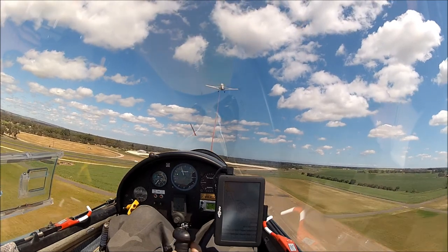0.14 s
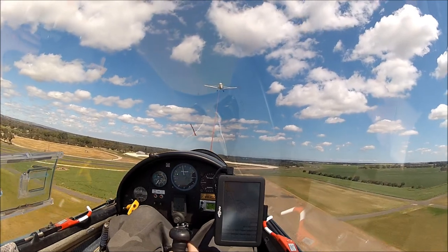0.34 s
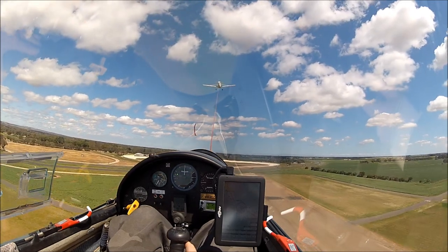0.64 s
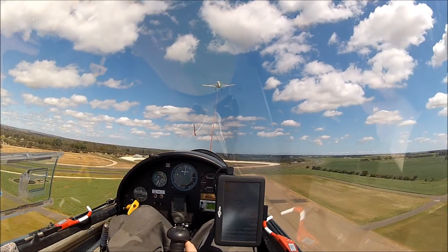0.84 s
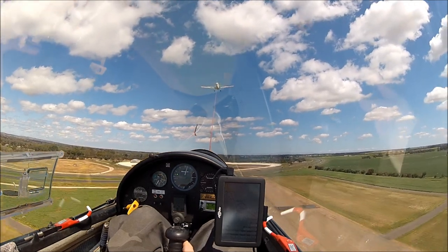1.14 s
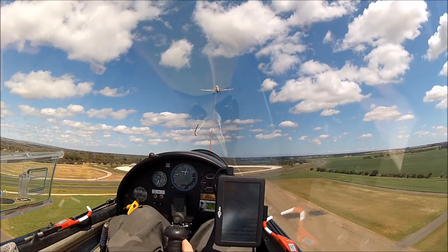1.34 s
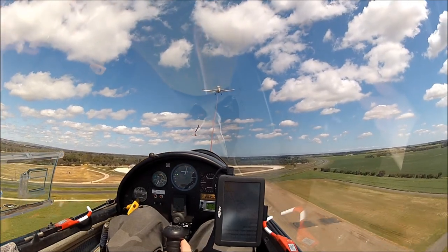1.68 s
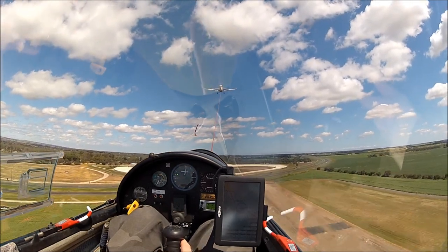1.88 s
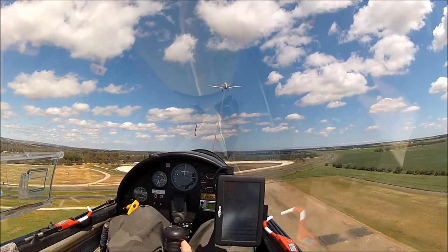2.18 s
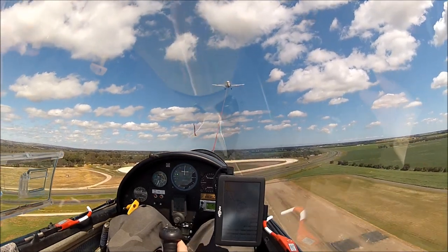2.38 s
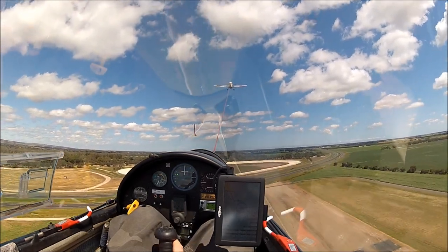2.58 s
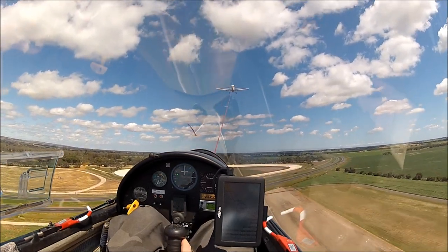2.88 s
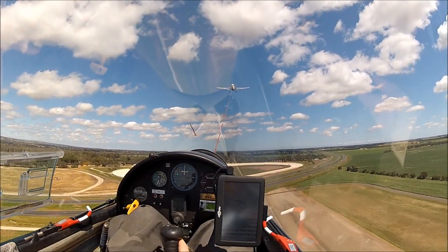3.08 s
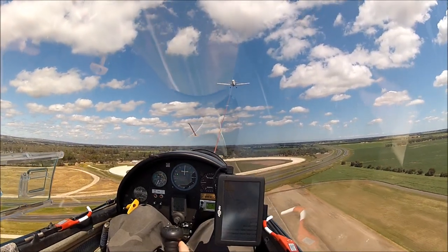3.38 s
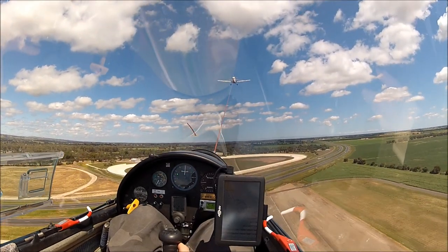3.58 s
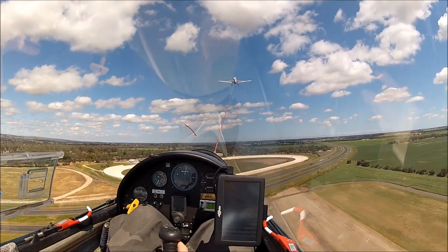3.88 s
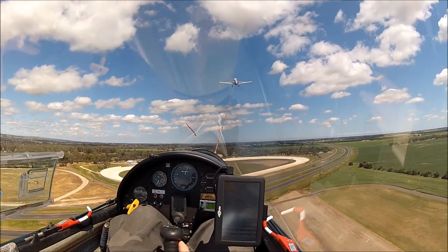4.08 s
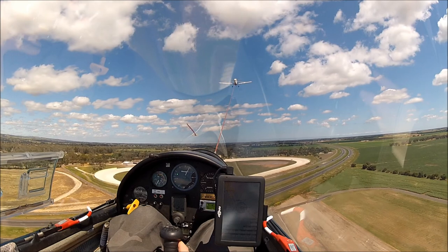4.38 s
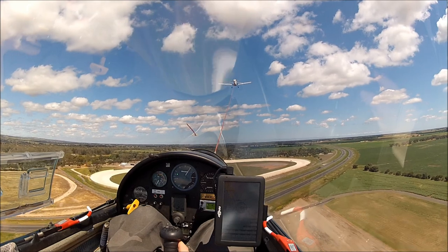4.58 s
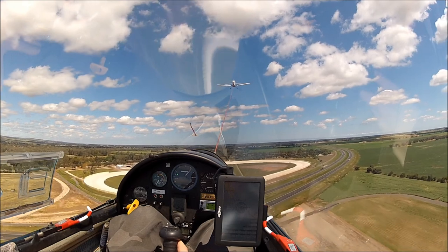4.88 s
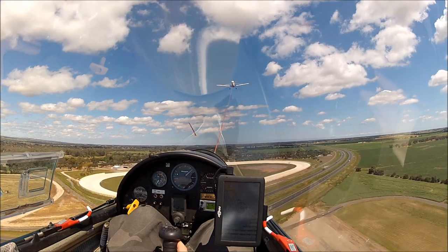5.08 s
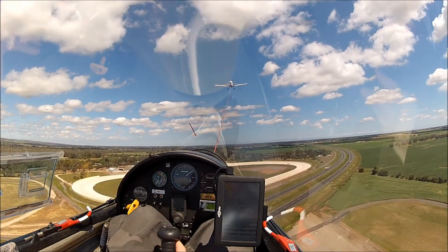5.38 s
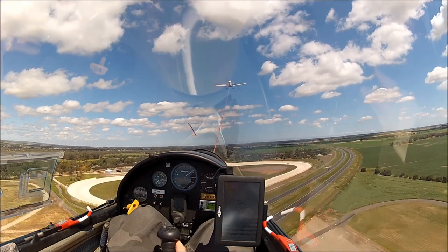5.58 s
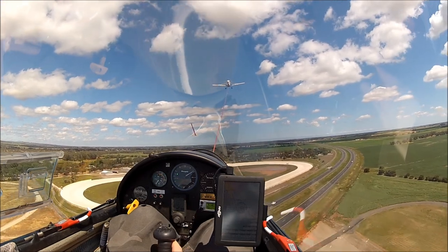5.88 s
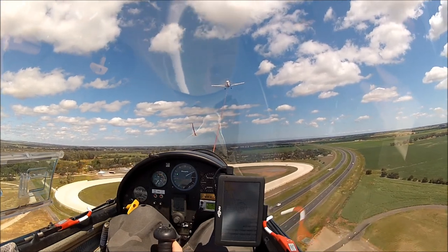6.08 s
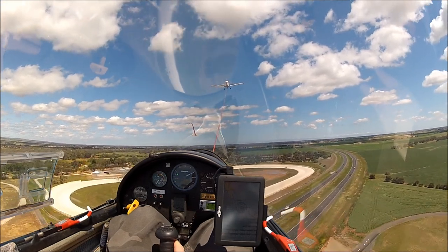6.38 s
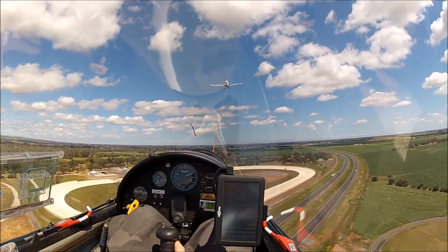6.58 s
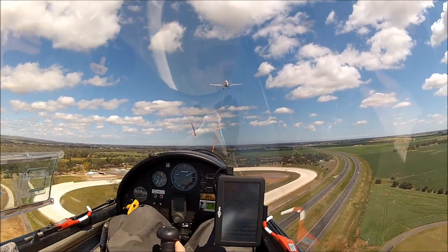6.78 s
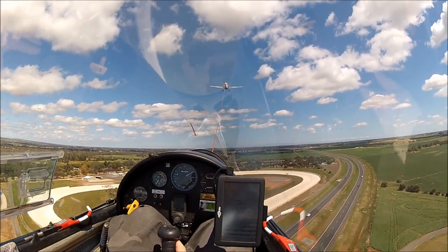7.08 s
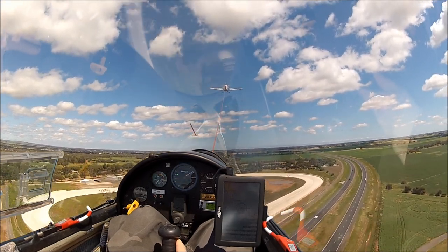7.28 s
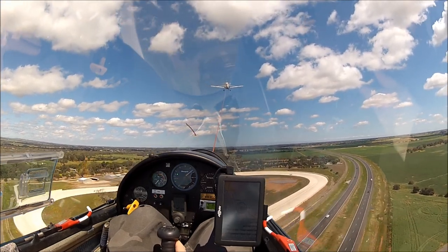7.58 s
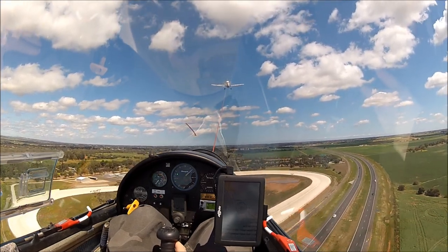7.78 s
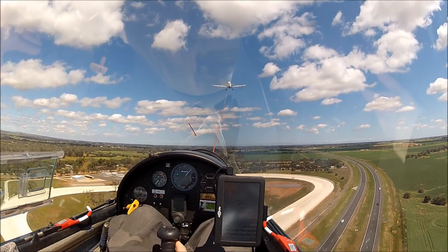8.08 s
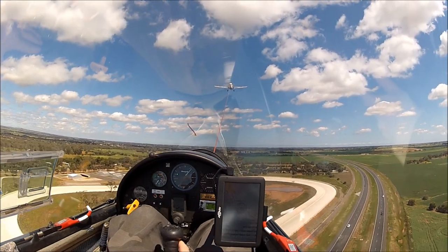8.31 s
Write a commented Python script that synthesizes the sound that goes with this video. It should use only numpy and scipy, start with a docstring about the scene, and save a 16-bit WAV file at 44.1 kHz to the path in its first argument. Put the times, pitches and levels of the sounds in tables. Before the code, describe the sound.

Close inside a small glider cockpit on tow, a deep fluttering boom and muffled wind roar run continuously. A short rush of air opens it, faint gusts pass the canopy in the first few seconds, and a light double knock comes just after two. The flow eases near three, then booms back. A thin, gritty high sizzle follows the rumble.

```python
"""Inside the cockpit of a glider climbing on tow. Turbulent air excites the low cavity modes, which boom and beat
against each other. The slipstream roars through the shell and hisses at the canopy seals; a few brief gusts
rush past the canopy edge, and a loose fitting knocks lightly by modal ringing.
A sampler holding its values at a low rate mirrors the rumble, by aliasing, into a thin high sizzle."""
import sys
import numpy as np
from scipy import signal
from scipy.fft import rfft, irfft, next_fast_len
from scipy.io import wavfile
from scipy.ndimage import uniform_filter1d, map_coordinates

SR = 44100
rng = np.random.default_rng(int(sys.argv[2]) if len(sys.argv) > 2 else 0)


def store_wav(level_fs):
    """Save 16-bit WAV to argv[1]."""
    pcm = np.round(np.clip(np.atleast_2d(level_fs), -1, 1) * 32767)
    wavfile.write(sys.argv[1], SR, pcm.T.astype(np.int16))


N = 372644
TIME_S = np.arange(N) / SR

# band edges: cavity pressure, cavity modes, shell roar, whole roar
SUB_TOP_HZ, BOOM_TOP_HZ, SHELL_TOP_HZ, ROAR_TOP_HZ = 72, 145, 453, 1000
HOLD_HZ = 12000  # hold rate of the sampler
NYQUIST_HZ = HOLD_HZ / 2  # top of the air noise, half the hold rate


def amp(db):
    """Level definition: 20 dB is a factor of ten in amplitude."""
    return 10 ** (np.asarray(db) / 20)


def unit(x):
    """Normalisation: scale to an rms of 1."""
    return x / np.sqrt(np.mean(x ** 2) + 1e-20)


def wobble(rate):
    """Random modulation: a smooth curve through `rate` random knots a second."""
    knots = rng.standard_normal(int(N * rate / SR) + 4)
    return map_coordinates(knots, [np.arange(N) * rate / SR])


def swells(rows, attack_s, release_s):
    """Envelope principle: each (time, length, dB) row rises, holds for its length and dies away."""
    gains = []
    for start, length, db in rows:
        corners = [start - attack_s, start, start + length, start + length + release_s]
        gains.append(amp(db) * np.interp(TIME_S, corners, [0, 1, 1, 0]))
    return np.max(gains, axis=0)


def filtered(x, response):
    """Linear filtering: multiply the spectrum by a response of frequency."""
    size = next_fast_len(N + SR // 2)
    hz = np.fft.rfftfreq(size, 1 / SR)
    return irfft(rfft(x, size) * response(hz), size)[:N]


def turbulence(spectrum, resonances, low_hz, high_hz):
    """Broadband excitation: one band of eddy noise of rms 1, shaped by each resonance."""
    size = next_fast_len(N + SR // 2)
    hz = np.fft.rfftfreq(size, 1 / SR)
    knots, levels = np.transpose(spectrum)
    db = np.interp(np.log(hz + 1), np.log(knots), levels)
    for centre, width, lift in resonances:
        db = db + lift * np.exp(-2 * ((hz - centre) / width) ** 2)
    inside = (hz > low_hz) & (hz <= high_hz)
    noise = rfft(rng.standard_normal(size))
    return unit(irfft(noise * amp(db) * inside, size)[:N])


def steadied(x, seconds):
    """Short-time power: dividing by it evens out slow swells and keeps fast beating."""
    size = max(int(seconds * SR), 2)
    power = uniform_filter1d(uniform_filter1d(x ** 2, size), size)
    return x / np.sqrt(np.abs(power) + 1e-9)


def hollow(x, count=30):
    """Comb interference: weak echoes from the close canopy and walls colour the sound."""
    delays_s = rng.uniform(.002, .014, count)
    gains = rng.normal(0, .028, count)
    echoes = np.bincount(np.round(delays_s * SR).astype(int), gains)
    echoes[0] = 1  # direct sound
    return unit(signal.fftconvolve(x, echoes)[:N])


# air noise in the cockpit, relative spectrum: (frequency [Hz], density [dB per Hz])
AIR_SPECTRUM = [(12.0, -35), (25.0, -35), (72.0, -34), (84.0, 1), (130.0, -15), (260.0, -20.5),
                (400.0, -30.5), (440.0, -36.5), (820.0, -41.5), (1050.0, -51.5), (1650.0, -55.5),
                (2700.0, -50.5), (4200.0, -51), (5200.0, -57.5), (6000.0, -71)]
# resonances of cavity, shell and canopy gaps: (frequency [Hz], width [Hz], lift [dB])
CABIN_MODES = [(32, 15, 7), (59, 19, 7.5), (89.8, 5, 6.5), (106.9, 9.1, 9), (129.1, 12.3, 11.5),
               (151, 7.4, 9), (189.4, 31, 4), (242, 20, 8.5), (312, 29, 3.5), (356.8, 16.5, 4.5),
               (383.3, 21.2, 6), (502.4, 31, 4.5), (715.4, 35, 6), (755.6, 28, 5), (1180, 24.8, -5),
               (1335, 72, 3), (1950, 51, 2), (2773, 60, 3.5), (3987, 100, 6)]
ROAR_DB, HISS_DB = -22, -45  # levels at 0 dB flow
HISS_GROWS = 0.05  # dB of seal hiss for each dB of flow


def slipstream(flow_db, flutter_db=0.34):
    """Aerodynamic noise: flow along the fuselage roars through the shell; seal leaks hiss evenly."""
    roar = steadied(turbulence(AIR_SPECTRUM, CABIN_MODES, BOOM_TOP_HZ, ROAR_TOP_HZ), seconds=0.35)
    # only the low roar of the shell swells with the flow
    shell_roar = filtered(roar, lambda hz: hz < SHELL_TOP_HZ)
    upper_roar = roar - shell_roar
    hiss = hollow(turbulence(AIR_SPECTRUM, CABIN_MODES, ROAR_TOP_HZ, NYQUIST_HZ))
    hiss_gain = amp(HISS_DB + HISS_GROWS * flow_db + flutter_db * wobble(12))
    return amp(ROAR_DB) * (amp(flow_db) * shell_roar + upper_roar) + hiss_gain * hiss


# gusts past the canopy edge: (time [s], length [s], level [dB])
GUSTS = [(0.0, 0.12, -36), (1.26, 0.054, -45.5), (1.56, 0.2, -43.5), (2.29, 0.16, -39), (2.99, 0.16, -40.5)]
# colour of their rush, relative spectrum: (frequency [Hz], density [dB per Hz])
RUSH_SPECTRUM = [(200, -34), (400, -5), (800, -0.5), (1020, -15.5), (1400, -16.5), (1750, -19.5),
                 (2300, -17.5), (4000, -31)]
# resonances of the canopy gap: (frequency [Hz], width [Hz], lift [dB])
GAP_MODES = [(710, 68, 5), (1220, 45, 7), (2320, 50, 11)]


def surges(flutter_db=1.8):
    """Edge noise: gusts push a fluttering, resonant rush past the canopy edge."""
    push = swells(GUSTS, attack_s=0.05, release_s=0.062)
    flutter = amp(flutter_db * wobble(35))
    return push * flutter * turbulence(RUSH_SPECTRUM, GAP_MODES, BOOM_TOP_HZ, NYQUIST_HZ)


# light knocks of a cockpit fitting: (time [s], level [dB])
KNOCK_TIMES = [(2.241, -42), (2.256, -41)]
# ringing modes of the fitting: (frequency [Hz], level relative to the knock [dB], 60 dB decay time [s])
FITTING_MODES = [(720, 2, .1), (1220, -1, .25), (2340, -12, .08)]


def knocks(attack_s=0.0023):
    """Modal decay: each knock rings the loose fitting's modes; chatter in phase roughens them."""
    sound = np.zeros(N)
    for start, db in KNOCK_TIMES:
        t = np.maximum(TIME_S - start, 0)
        for hz, level, t60 in FITTING_MODES:
            chatter = .7 * wobble(110)  # phase [rad]
            onset = 1 - np.exp(-t / attack_s)
            decay = amp(db + level - 60 * t / t60)
            sound += onset * decay * np.sin(2 * np.pi * hz * t + chatter)
    return sound


BOOM_DB, BOOM_GROWS = -15.5, 1.4  # eddy drive at 0 dB flow; dB of it for each dB of flow
BUFFET_DB, BUFFET_RATE = 2, 20  # depth of the random eddy swings, and knots a second
# strongest bumps of air on the shell: (time [s], length [s], drive before trim [dB])
AIR_BUMPS = [(0.267, 0.028, -9.5), (0.64, 0.048, -8.5), (0.72, 0.045, -10), (2.68, 0.091, -7.5),
             (3.487, 0.077, -7.5), (3.702, 0.11, -9.5), (4.11, 0.078, -10.5), (4.305, 0.052, -10),
             (4.575, 0.039, -9.5), (4.726, 0.029, -13), (5.012, 0.047, -11.5), (5.108, 0.032, -9),
             (5.298, 0.027, -11), (5.612, 0.02, -13.5), (5.763, 0.03, -9.5), (6.06, 0.058, -12.5),
             (6.222, 0.037, -11.5), (6.343, 0.029, -8.5), (6.437, 0.059, -13.5), (6.584, 0.04, -12),
             (6.674, 0.051, -12), (6.969, 0.046, -9), (7.123, 0.04, -8.5), (7.39, 0.035, -10.5),
             (7.5, 0.048, -14), (7.593, 0.11, -10), (7.768, 0.16, -9.5), (7.906, 0.037, -13),
             (8.262, 0.052, -9), (8.372, 0.066, -9.5)]
BUMP_TRIM_DB = -2


def boom(flow_db, pressure_db=-35):
    """Cavity resonance: eddies and bumps drive low, beating modes over an even pressure rumble."""
    eddies = amp(BOOM_DB + BOOM_GROWS * flow_db + BUFFET_DB * wobble(BUFFET_RATE))
    bumps = amp(BUMP_TRIM_DB) * swells(AIR_BUMPS, attack_s=0.016, release_s=0.023)
    drive = np.hypot(eddies, bumps)  # the powers add
    modes = steadied(turbulence(AIR_SPECTRUM, CABIN_MODES, SUB_TOP_HZ, BOOM_TOP_HZ), seconds=0.08)
    # the driven boom fades out below 82 Hz and is gone by 72 Hz, leaving the lows to the rumble
    driven = filtered(drive * modes, lambda hz: np.interp(hz, [SUB_TOP_HZ, 82], [0, 1]))
    pressure = steadied(turbulence(AIR_SPECTRUM, CABIN_MODES, 10, SUB_TOP_HZ), seconds=0.36)
    return driven + amp(pressure_db) * pressure


# the airflow eases in a patch of calm air, then picks up again: (time [s], strength [dB])
FLOW_STRENGTH = [(0, 0.5), (0.8, 0.5), (1.3, 0), (2.05, -1), (2.4, -0.5), (3.0, -3), (3.55, 0.3),
                 (5.1, 0.8), (5.8, -0.1), (7.0, 0.5), (8.4, 0)]


def scene():
    """Superposition: all sources add; one flow strength drives the slipstream and the boom."""
    times, strengths = np.transpose(FLOW_STRENGTH)
    flow_db = np.interp(TIME_S, times, strengths)
    return (slipstream(flow_db) + surges() + knocks() + boom(flow_db))[None]


def record(dry, mirror_db=0.5, top_hz=15350):
    """Aliasing: sample-and-hold mirrors the sound around the hold rate, up to a band limit."""
    sound = dry[0]
    mirror = 2 * np.cos(2 * np.pi * HOLD_HZ * TIME_S) * sound
    held = sound + amp(mirror_db) * mirror
    # holding each value weights the spectrum by a sinc
    return filtered(held, lambda hz: np.sinc(hz / HOLD_HZ) * (hz < top_hz))[None]


dry = scene()
out = record(dry)
store_wav(out)
```